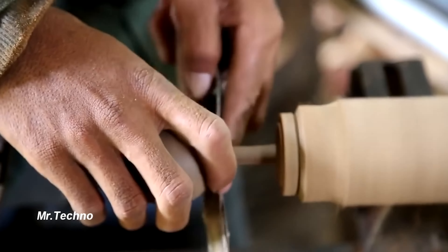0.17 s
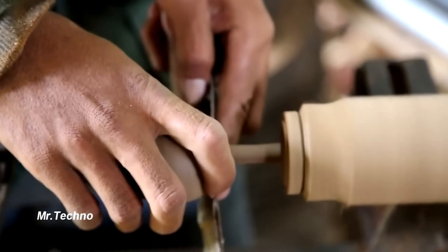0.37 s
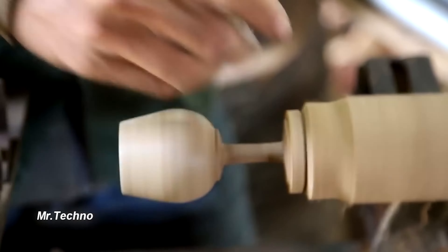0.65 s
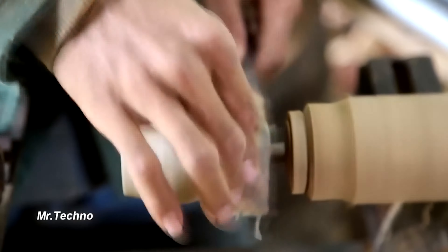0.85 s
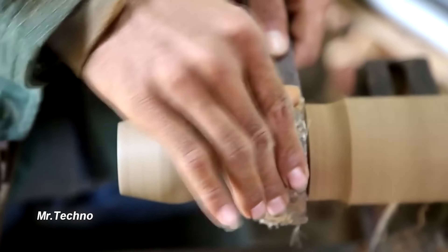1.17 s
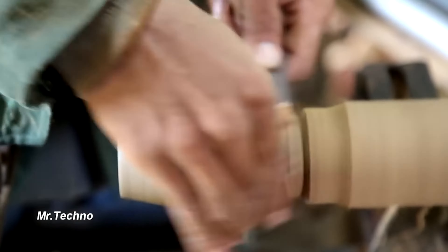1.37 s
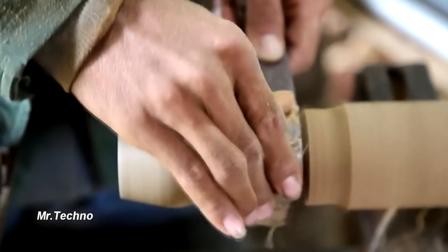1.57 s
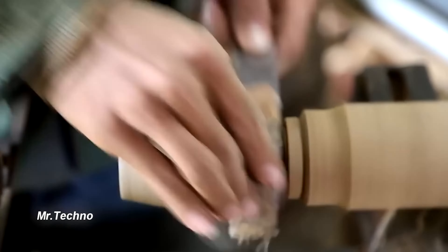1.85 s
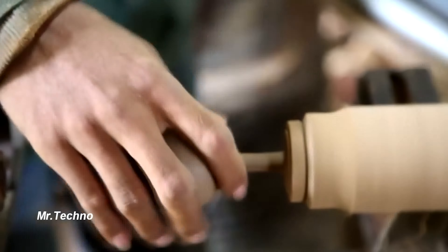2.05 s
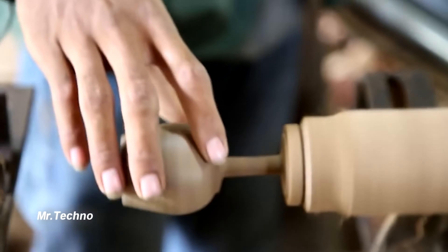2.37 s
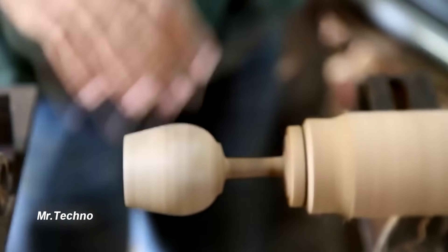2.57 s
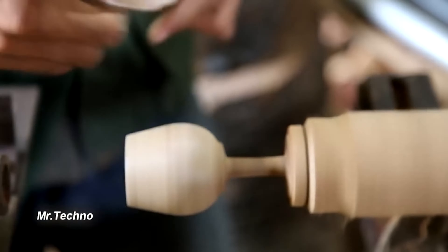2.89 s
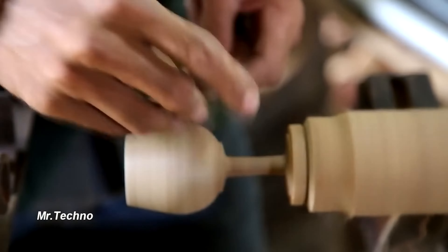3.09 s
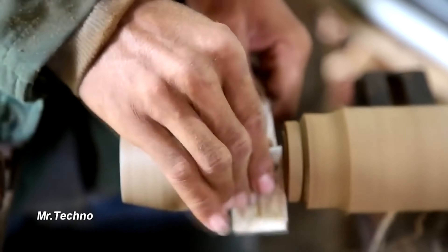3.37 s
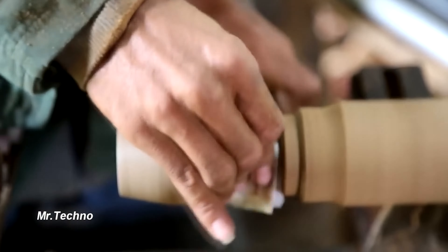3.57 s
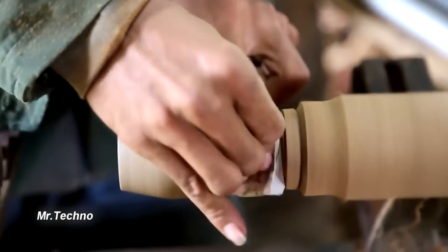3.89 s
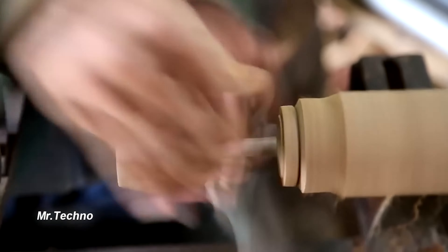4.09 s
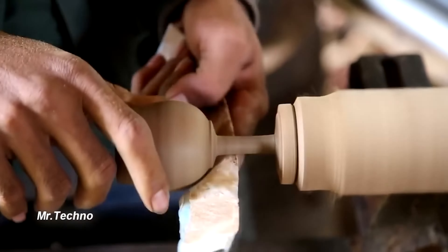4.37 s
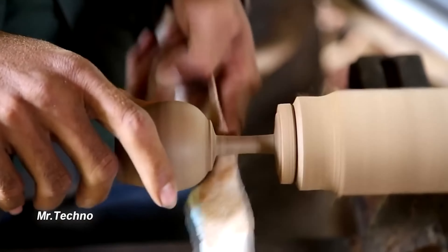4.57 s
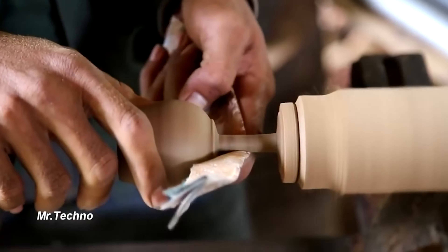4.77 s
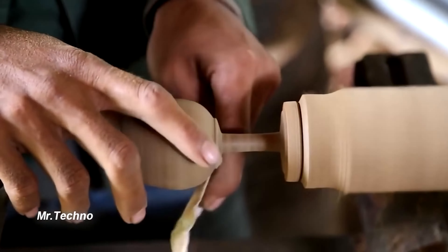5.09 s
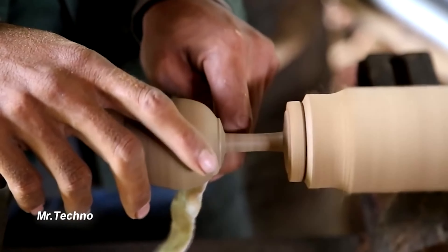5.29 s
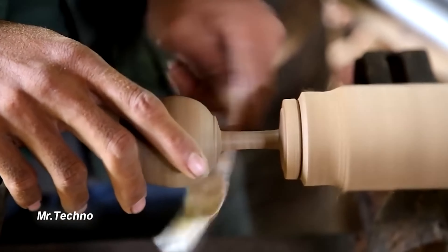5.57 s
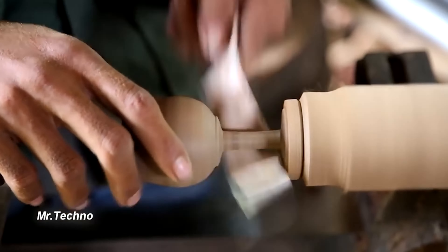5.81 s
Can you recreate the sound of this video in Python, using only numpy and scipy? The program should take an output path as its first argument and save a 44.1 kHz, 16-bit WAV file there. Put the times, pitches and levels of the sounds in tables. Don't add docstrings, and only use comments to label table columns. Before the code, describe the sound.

A small wood lathe runs at constant speed for about six seconds, heard from one close microphone in a workshop with only a faint, short reverberation. A dense, dry sandpaper hiss dominates, broad from low-mid rasp to bright air, coloured by the ringing metal machine body. Under it lie a fluttering spindle rattle and a low motor hum. A thin bearing whine around 1.4 kHz wavers in pitch and strength, swelling near 0.2, 1.9 and 4.5 s and dropping out briefly, as at 1.3, 2.5 and 3.5 s. The paper catches slightly at 1.0, 1.6, 3.4 and 5.9 s, and the top brightens a little around 1.3 s. Tiny ticks of grit snap at 1.6, 1.7, 1.9, 3.0 and 5.1 s. Soft dull bumps occur early, around 2.3 to 2.6 s and at 4.1 s, with the clearest short knock at 3.2 s. Everything continues to the end without stopping.

```python
import sys
import numpy as np
from scipy import signal
from scipy.fft import rfft, irfft
from scipy.io import wavfile

SR = 44100
rng = np.random.default_rng(int(sys.argv[2]) if len(sys.argv) > 2 else 0)


def master_out(mix):
    frames = np.transpose(np.atleast_2d(mix))
    ceiling = np.clip(frames, -1, 1)
    pcm = np.round(ceiling * 32767).astype(np.int16)
    wavfile.write(sys.argv[1], SR, pcm)


def elevation(decibels):
    levels = np.asarray(decibels, float)
    return 10 ** (levels / 20)


N = 261954


def rms_one(x):
    return x / np.sqrt(np.mean(x ** 2) + 1e-20)


def in_time(rows):
    times, *columns = np.transpose(rows)
    return [np.interp(np.arange(N) / SR, times, column) for column in columns]


def moments(rows, length_s):
    t = np.arange(N) / SR
    return sum(db * .5 ** ((2 * (t - at_s) / length_s) ** 2) for at_s, db in rows)


def drift(rate_hz, spread_db=None):
    every, settle = 40, 2000
    pole = np.exp(-2 * np.pi * rate_hz * every / SR)
    draws = rng.standard_normal(N // every + settle + 2)
    slow = signal.lfilter([1], [1, -2 * pole, pole * pole], draws)[settle:]
    slow = rms_one(slow - slow.mean())
    if spread_db:
        slow = elevation(spread_db * slow)
    return np.interp(np.arange(N) / every, np.arange(len(slow)), slow)


def turning(rate_hz):
    return 2 * np.pi * np.cumsum(rate_hz * np.ones(N)) / SR


def orders(angle, table, smear, slip, sway_db, pace):
    out = np.zeros(N)
    for k, level_db in table:
        phase = k * angle + smear * k * k + slip * k * drift(pace)
        level = np.sqrt(2) * elevation(level_db) * drift(pace, sway_db)
        out += level * np.cos(phase)
    return out


def spindle():
    # (time [s], rate [turns/s])
    speed = [
        (0, 27.6),
        (1, 27.6),
        (1.2, 27.52),
        (2, 27.52),
        (2.4, 27.58),
        (3.5, 27.57),
        (4.1, 27.55),
        (4.6, 27.66),
        (5.94, 27.68),
    ]
    # (multiple of the turn rate, level [dB rms])
    knock = [(4, -81), (5, -70), (6, -62), (7, -71), (8, -63), (9, -60), (10, -64), (11, -66), (12, -51),
             (13, -63), (14, -58), (15, -51.2), (16, -61), (18, -56), (20, -64), (21, -60), (23, -61),
             (25, -65), (26, -63), (27, -68), (28, -67), (29, -61), (30, -60), (33, -69)]
    angle = turning(in_time(speed)[0])
    return elevation(-0.37) * orders(angle, knock, smear=.35, slip=0.0055, sway_db=0.65, pace=2.6)


def motor(motor_angle):
    # (multiple of the shaft rate, level [dB rms])
    knock = [(1, -77), (2, -64.5), (3, -67.5), (4, -64.5), (6, -59), (9, -57.5), (10, -61), (11, -64),
             (12, -70.5)]
    return orders(motor_angle, knock, smear=0.206, slip=0.14, sway_db=-1.0, pace=2.6)


def belt():
    lap_hz, start_rad = 7.6, 3.55
    return np.cos(turning(lap_hz) + start_rad)


def bearing(motor_angle):
    # (multiple of the ball-pass rate, level [dB rms])
    partials = [(1.5, -60), (2.0, -58), (2.5, -63.5), (3.0, -64.5), (4.0, -55), (5.0, -74), (6.0, -42),
                (7.0, -48.5), (7.5, -68), (9.0, -52.5), (11.0, -58.5), (11.5, -54.5), (12.0, -65),
                (22.11, -51.5)]
    # (time [s], level [dB rms])
    load = [(0, -45), (.21, -37), (.38, -46.5), (.43, -40), (1.72, -39.0), (1.82, -43.5), (1.94, -35),
            (2.05, -40), (2.16, -45.5), (2.25, -40.1), (2.54, -41), (2.85, -38.5), (3.58, -38.5),
            (4.31, -40.5), (4.52, -35.3), (4.61, -38), (5.5, -38), (5.94, -37.5)]
    # (time [s], frequency [Hz])
    pitch = [(0, 1426), (.3, 1428), (.55, 1433), (.8, 1429), (1.1, 1425), (1.4, 1420), (1.75, 1420),
             (2, 1427), (2.5, 1428), (3.3, 1427), (3.7, 1420), (4, 1425), (4.4, 1424), (4.8, 1427),
             (5.2, 1434), (5.6, 1432), (5.94, 1434)]
    # (time [s], depth [dB])
    skids = [(.28, 8), (.69, 1), (.79, 3), (.92, 10), (1.02, 1), (1.28, 13), (1.63, 5), (2.55, 12),
             (2.94, 7), (3.31, 3), (3.46, 12), (3.6, 7), (3.74, 6), (4.0, 4), (4.29, -2), (4.61, 3),
             (4.71, 8), (4.86, 6), (5.0, 6), (5.43, 4)]

    angle = turning(in_time(pitch)[0] / 6)
    load_db, = in_time(load)
    cage_db = -0.7 * np.cos(turning(16.9) - 1.2)
    sixth_db = load_db + cage_db + 0.2 * belt() - moments(skids, length_s=.04)
    seventh_db = -48 + 0.41 * (load_db - load_db.mean()) + cage_db

    others = [row for row in partials if row[0] not in (6, 7)]
    rest = orders(angle, others, smear=.3, slip=.04, sway_db=2.0, pace=9.0)
    sixth = elevation(sixth_db + 2.4) * drift(20, 1.9) * np.cos(6 * angle + .5 * drift(12))
    seventh = elevation(seventh_db + 2.2) * drift(16, 2.2) * np.cos(7 * angle + .7 * drift(12))
    shaft_load = 1 + .15 * np.cos(motor_angle)
    return (elevation(.5) * rest + sixth + seventh) * shaft_load


def pressure():
    # (time [s], level about the mean [dB])
    hand = [(0.0, 0.86), (1.99, -0.0), (2.08, -0.9), (2.25, 2.4), (2.54, 0.4), (2.77, 0.1), (2.84, 2),
            (2.91, 0.9), (3.08, 1.4), (3.31, 0), (3.36, -0.1), (3.83, 1.3), (4.04, -1), (4.11, 0.8),
            (4.42, 1), (4.75, -0.4), (4.8, 0.9), (5.94, 0.24)]
    # (time [s], lift [dB])
    catches = [(.16, 1.5), (.43, 1.2), (1.0, 2.5), (1.39, -1.5), (1.64, 3.5), (1.72, 1.7), (2.41, 1),
               (2.99, 0), (3.37, 3), (3.52, 1.5), (3.78, 1.2), (4.81, 1.2), (5.22, 1), (5.87, 3)]
    return in_time(hand)[0] + moments(catches, length_s=.024) + 0.22 * belt()


def body_colour(hz):
    # (frequency [Hz], level [dB per Hz])
    slope = [(25, -41.5), (60, -34), (130, -25), (300, -18), (700, -16), (1500, -12), (3000, -13.5),
             (5000, -14), (7000, -18.5), (8800, -17.5), (9400, -22.5), (11500, -24), (12300, -29),
             (15750, -30.5)]
    # (centre [Hz], width [Hz], lift [dB])
    bed = [(345, 60, 2), (480, 60, 2), (731, 25, -4.6), (839, 80, 3.0), (1001, 80, -2.2), (1109, 45, 2.8),
           (1271, 80, -2.9), (1433, 60, 4), (1500, 120, 2), (1781, 30, 2), (1847, 45, -4.3),
           (1937, 80, 2.3), (2315, 45, -2.4), (2441, 80, 2.4), (2639, 150, -3.2), (2729, 45, 3)]
    # (centre [Hz], width [Hz], lift [dB])
    housing = [(3032, 45, -3.3), (3368, 80, -4.5), (3656, 150, -3.9), (4136, 150, 2.3), (4472, 300, 2.5),
               (4904, 45, -4.7), (5192, 80, -4.4), (5240, 80, 6.0), (5288, 80, 3.6), (5432, 150, -2.8),
               (6200, 80, 4.0), (6344, 80, 3.0), (6392, 130, 7.5), (7304, 150, 2.9), (7592, 120, 6.0),
               (7784, 80, -2.2), (7928, 150, 3.0), (8120, 130, 7.2), (8360, 80, 4.9), (8552, 80, 3.8),
               (8744, 150, -2.1)]
    # (centre [Hz], width [Hz], lift [dB])
    mic_port = [(9272, 150, -2.2), (9752, 80, 3.8), (9992, 120, 6.0), (11240, 150, 2.1), (11624, 150, -2.4),
                (11912, 150, 2.5), (12104, 150, -2.2), (12536, 150, 3.0), (13256, 150, 3.5),
                (13880, 150, -3.1), (14216, 150, 3.2), (14600, 150, 3.0), (14792, 300, 2.4),
                (14840, 120, 5.3)]
    slope_hz, slope_db = np.transpose(slope)
    level_db = np.interp(np.log(hz), np.log(slope_hz), slope_db)
    for centre_hz, width_hz, lift_db in [*bed, *housing, *mic_port]:
        level_db += lift_db * .5 ** ((2 * (hz - centre_hz) / width_hz) ** 2)
    return elevation(level_db)


def workshop(t60, wet_db):
    t = np.arange(SR // 4) / SR
    tail = rng.standard_normal(len(t)) * elevation(-60 * t / t60) * (t > .002)
    tail = tail / np.sqrt(np.sum(tail ** 2))
    return 1 + elevation(wet_db) * rfft(tail, N)


def sanding(motor_angle, patchy_db, throb):
    # (time [s], lift [dB])
    fresh = [
        (1.28, 1.8),
        (2.95, .6),
    ]
    hz = np.arange(N // 2 + 1) * SR / N + .01
    spectrum = rfft(rng.standard_normal(N)) * body_colour(hz) * workshop(t60=.2, wet_db=-17.0)

    machine, rasp, hiss, air = elevation(np.outer([1.2, 1.14, 0.71, 0.74], pressure()))
    air = air * elevation(moments(fresh, length_s=.39))

    together = drift(34, spread_db=0.49)
    place = np.clip(1.5 * np.log2(hz / 40), 0, 13)
    out = np.zeros(N)
    for k in range(14):
        share = np.clip(1 - np.abs(place - k), 0, 1)
        centre_hz = 40 * 2 ** (k / 1.5)
        if centre_hz < 300:
            effort = 1
        elif centre_hz < 1500:
            effort = machine
        elif centre_hz < 4000:
            effort = rasp
        elif centre_hz < 9000:
            effort = hiss
        else:
            effort = air
        out += effort * drift(14.4, patchy_db) * irfft(spectrum * share, N)
    shaft_throb = 1 + throb * np.cos(motor_angle) + throb / 2 * np.cos(2 * motor_angle)
    return rms_one(out * together * shaft_throb)


def soft_knocks(rows):
    out = np.zeros(N)
    t = np.arange(-SR // 25, SR // 25) / SR
    for at_s, peak_db, hz, length_s in rows:
        start = round(at_s * SR) - len(t) // 2
        bell = .5 ** ((2 * t / length_s) ** 2)
        out[start:start + len(t)] += elevation(peak_db) * bell * np.cos(2 * np.pi * hz * t)
    return out


def bumps():
    # (time [s], peak [dB], pitch [Hz], length [s])
    bed_bumps = [(.05, -41, 170, 0.0093), (.165, -49, 80, .018), (.36, -36, 322, 0.0086),
                 (.36, -41, 130, 0.013), (.625, -45, 120, 0.0074), (.805, -50, 100, .012),
                 (2.33, -37, 250, 0.013), (2.565, -34, 260, .005), (3.2048, -22.5, 377, 0.0032),
                 (3.2048, -31.5, 720, .003), (3.2125, -32, 430, .005), (3.228, -37, 250, 0.011),
                 (4.07, -37, 500, 0.0098), (5.25, -54, 70, .022)]
    return soft_knocks(bed_bumps)


def snaps():
    # (time [s], peak [dB], pitch [Hz], length [s])
    grains = [
        (1.644, -24, 2500, .0004),
        (1.7318, -26, 3200, 0.0011),
        (1.944, -27, 3200, .002),
        (2.9881, -22, 3000, .0006),
        (5.08, -26, 3300, .001),
    ]
    return soft_knocks(grains)


def scene():
    motor_angle = turning(57.58)
    grit = elevation(-32.45) * sanding(motor_angle, patchy_db=0.67, throb=0.028)
    mono = spindle() + motor(motor_angle) + bearing(motor_angle) + grit + bumps() + snaps()
    return np.array([mono, mono])


def noise_fills(mono):
    # (time [s], lower edge [Hz])
    flecks = [(.166, 8900), (1.095, 8840), (1.234, 9500), (1.234, 12800), (1.304, 7500), (1.304, 11900),
              (1.768, 9500), (1.838, 10300), (2.047, 6850), (2.047, 11200), (2.883, 6800), (3.463, 6240),
              (4.694, 4160), (4.857, 5050), (4.996, 4040), (4.996, 10900), (5.298, 7100)]
    width_hz, size, hop, offset = 1650, 2048, 1024, 160
    side = np.zeros(N)
    other = np.roll(mono, N // 3)
    hz = np.arange(size // 2 + 1) * SR / size
    window = np.hanning(size) ** 1.5
    for at_s, low_hz in flecks:
        start = round((at_s * SR - offset) / hop) * hop + offset - hop
        in_band = (hz > low_hz) * (hz < low_hz + width_hz)
        band = rfft(other[start:start + size]) * in_band
        side[start:start + size] += elevation(-1.0) * window * irfft(band)
    return side


def band_limit(x):
    return signal.sosfilt(signal.butter(12, 15790, fs=SR, output="sos"), x)


def record(dry):
    side = noise_fills(dry[0])
    mix = dry + side * [[1], [-1]]
    return band_limit(mix)


dry = scene()
out = record(dry)
master_out(out)
```